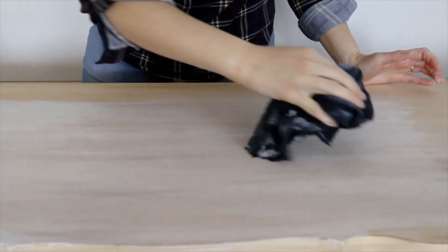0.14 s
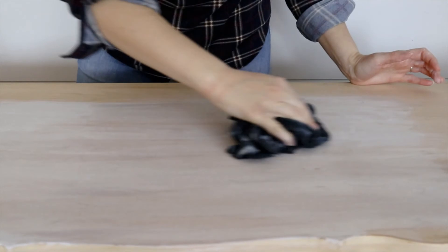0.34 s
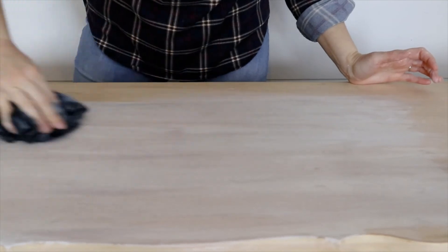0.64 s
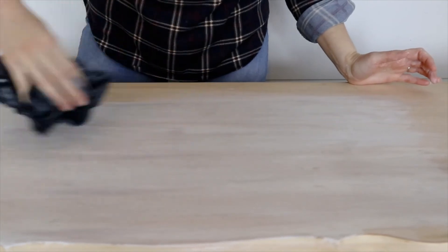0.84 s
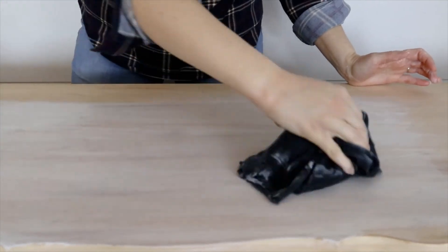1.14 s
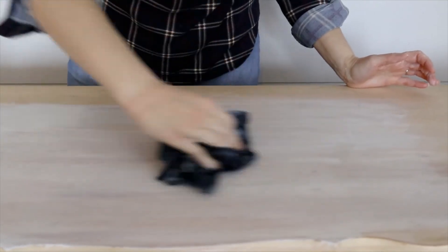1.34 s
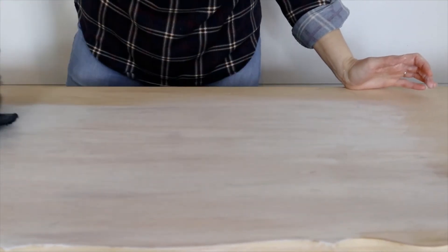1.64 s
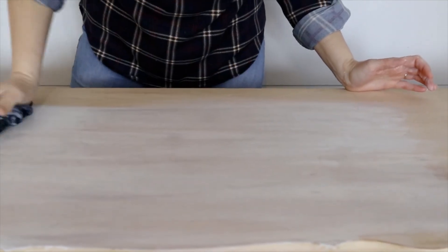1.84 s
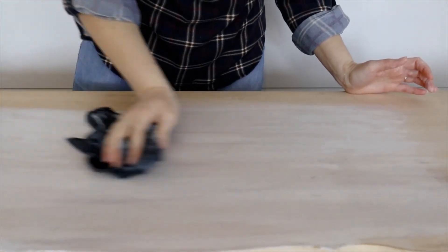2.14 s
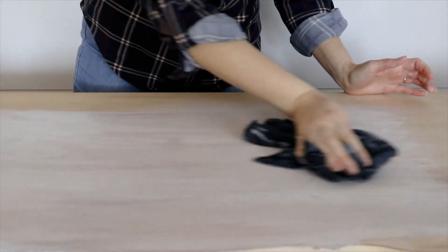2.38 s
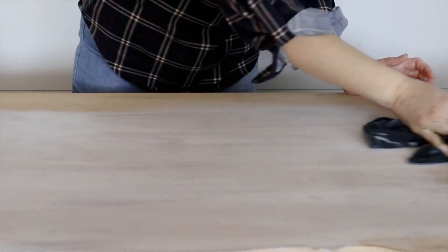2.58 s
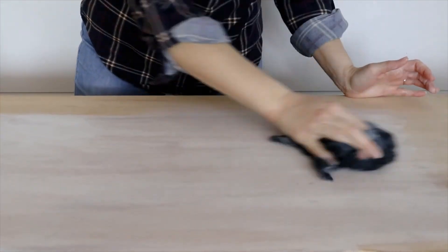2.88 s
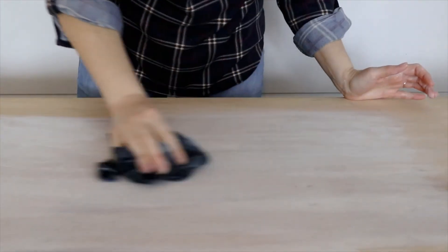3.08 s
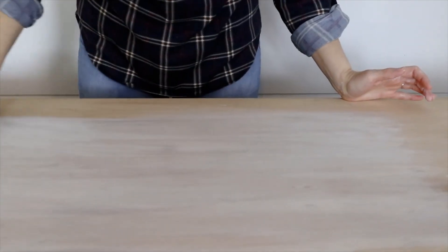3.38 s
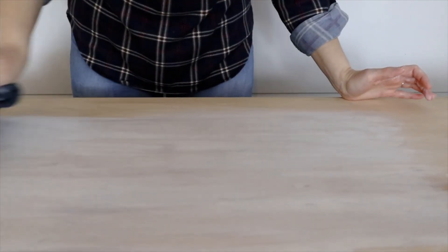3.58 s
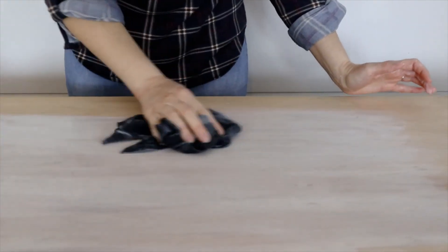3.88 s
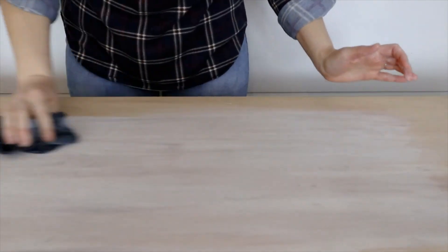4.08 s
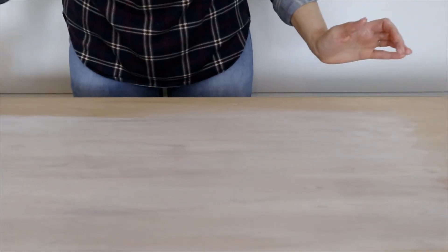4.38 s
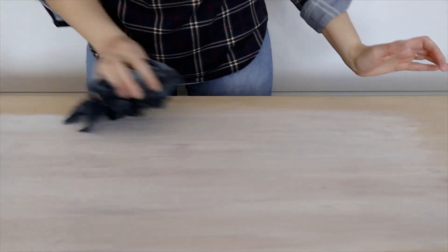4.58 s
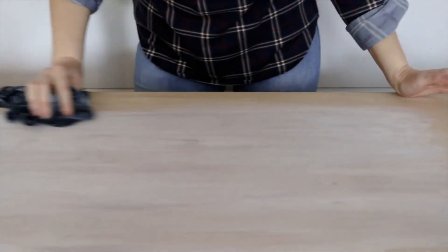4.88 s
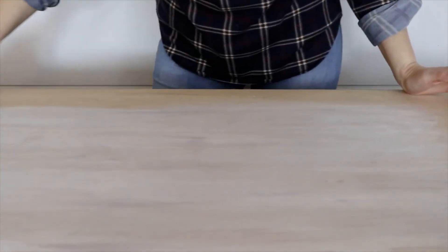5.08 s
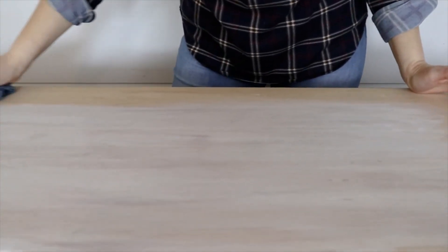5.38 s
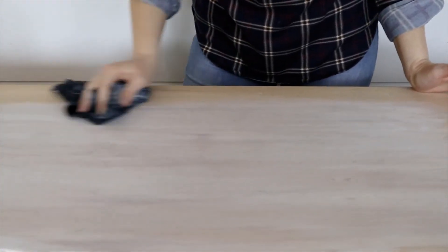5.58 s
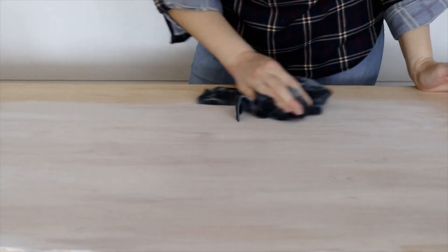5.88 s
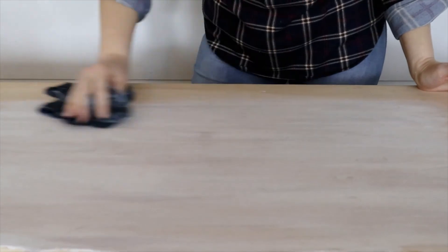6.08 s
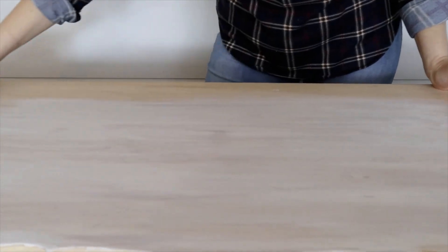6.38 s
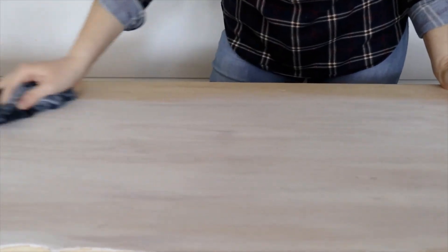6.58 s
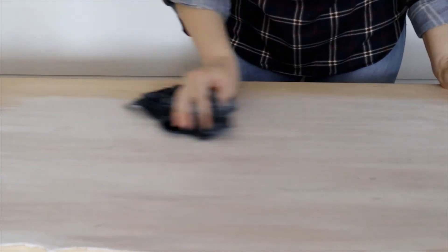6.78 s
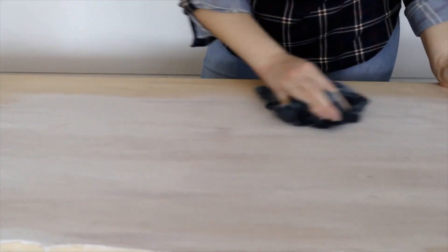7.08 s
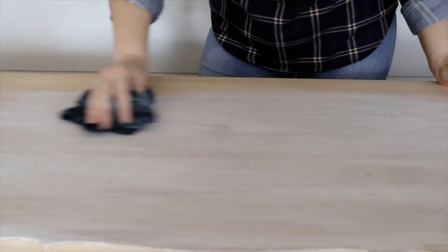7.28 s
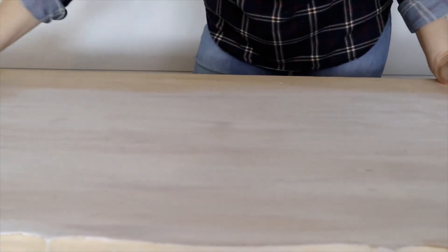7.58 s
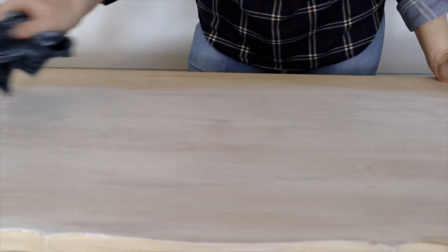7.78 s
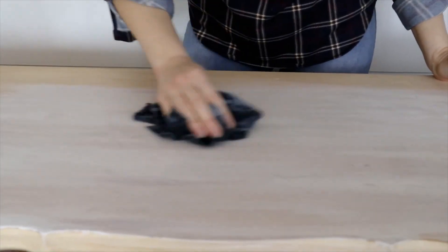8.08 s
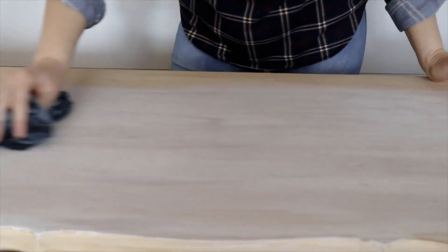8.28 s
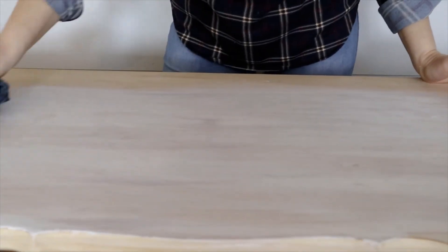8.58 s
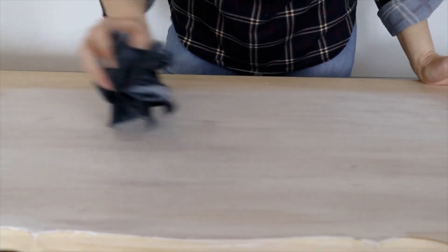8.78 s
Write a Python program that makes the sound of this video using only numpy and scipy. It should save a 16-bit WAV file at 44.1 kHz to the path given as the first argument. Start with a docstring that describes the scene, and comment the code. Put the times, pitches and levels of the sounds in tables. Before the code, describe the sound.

In a small room, heard closely in stereo, a cloth rag is wiped over a bare wooden tabletop. Dry, grainy hisses move at 0.3 s leftward, 1.25 s leftward and shorter, then 1.95 s rightward and 2.7 s back left, longer and with woody colour. Soft bumps fall at about 3.3 s, and at 3.53 s a hard little tick comes with a tiny falling squeak. A dull, cushioned thud leads into a stroke at 3.87 s. A cluster of muffled knocks at 4.56 to 4.68 s precedes the wipe at 4.7 s. Strokes then alternate steadily at 5.35, 5.9, 6.5 and 7.0 s, followed by a pause. At 8.0 s the hand lands with low thuds and scuffs, and a last wipe goes left until 8.5 s. Low mains hum, faint fan tones, deep rumble and soft room noise run throughout.

```python
"""Wiping a wooden tabletop

A cloth rag is wiped back and forth over a bare tabletop in a small room. Countless fibres slip on the
grain: shaped noise that follows the hand's speed and fizzes more the faster it goes. The board's
resonances colour the hiss, thud when the hand lands and sing under pressing fingers. Hard ticks and a
squeak are heard too; a deep rumble, a mains hum with faint fan tones and a soft room noise lie under it all."""
import sys
import numpy as np
from scipy import signal
from scipy.fft import rfft, irfft
from scipy.io import wavfile
from scipy.ndimage import uniform_filter1d

SR = 44100
rng = np.random.default_rng(int(sys.argv[2]) if len(sys.argv) > 2 else 0)


def generate_wav(sig):
    """Save sig (samples, or channels by samples) to the path in sys.argv[1] as 16-bit PCM at SR."""
    pcm = np.round(np.clip(np.atleast_2d(sig).T, -1, 1) * 32767).astype(np.int16)
    wavfile.write(sys.argv[1], SR, pcm)


N = 394254

# The strokes of the rag: start_s, length_s, level_db (relative), press_gain_db (start to end),
# from_place, to_place (-1 left, 1 right), rasp_hz (centre), woody_body_db, fold_rasp_db, fibre_fizz_db
# (the last three are strengths, weighted by pitch)
STROKES = [(0.3, 0.45, -35, 4.5, 0.97, -0.61, 3070, -12, 3.3, 0.5),
           (1.248, 0.29, -37.5, 7, 0.47, -0.93, 3120, 8, 3.9, 1.5),
           (1.95, 0.75, -33, -6, -0.33, 0.85, 1800, 1, 0.89, -6),
           (2.712, 0.77, -34.5, 2, 0.68, -0.98, 2240, -3.5, 1.2, -2),
           (3.870, 0.44, -35, 7, 0.21, -0.53, 2900, 1.5, 1.5, 0.5),
           (4.720, 0.38, -35, 6, -0.012, -0.57, 2700, -4.5, 1.4, 2),
           (5.352, 0.47, -34.5, 3.5, -0.78, 0.37, 3050, 2.5, 1.3, 0.5),
           (5.881, 0.47, -33, 4.5, 0.45, -0.76, 3020, -4, 2.1, -2),
           (6.474, 0.5, -34, 1.5, -0.9, 0.63, 1800, 2.5, 0.57, -3),
           (7.032, 0.58, -33.5, 2.5, 1, -1.04, 2870, 0, 1.8, -3.5),
           (8.033, 0.43, -33.5, 4, 0.66, -0.87, 2500, -3.5, 0.9, -4)]
# Light brushes as the rag is lifted, turned or set down: start_s, length_s, level_db (relative)
BRUSHES = [(0.2, .1, -70), (1.754, .07, -55.5), (1.838, 0.25, -44.5), (2.566, 0.16, -55),
           (3.527, 0.076, -44.5), (4.295, 0.15, -49), (4.566, 0.098, -50.5), (5.192, 0.26, -56),
           (6.383, 0.12, -58), (7.62, 0.11, -59), (8.51, .06, -46.5)]
# Fingers dig in: top_s, half_width_s, dig_db
DIGS = [(2.15, .04, 1), (3.38, 0.092, 3), (5.951, 0.06, 2.5), (7.12, .05, 1.5)]
# Colour of cloth on wood: pitch_hz, level_db (per Hz, relative)
RUB_COLOUR = [(220, -40), (380, -40), (455, -6.5), (522, -8), (571, -1), (685, -1.5), (871, -2.5),
              (998, -0.5), (1230, -1.5), (1590, -0.5), (2540, -3), (7540, -16), (11200, -19),
              (12000, -20.5), (14000, -42.5)]
# Low part of the rub: pitch_hz, level_db (relative)
RUB_LOWS = [(30, -33), (130, 4.0), (350, -0.5), (700, -43), (2000, -80)]
# Stereo width of the rub: pitch_hz, side_minus_mid_db
RUB_WIDTH = [(200, -68), (370, -8), (680, -22), (1260, -13), (2310, -9), (4240, -3.3), (6500, 0),
             (10000, 1.5), (14000, 9)]
# How much of the woody body and of the fizz acts at each pitch: pitch_hz, share (0 to 1)
BODY_SHARE = [(250, 0.024), (600, 0.28), (1000, 0.31), (1400, 0.07)]
FIZZ_SHARE = [(3900, 0.011), (5200, 0.32)]
# How much the spots of the board vary at each pitch: pitch_hz, share (0 to 1)
SPOT_SHARE = [(200, 0.2), (500, 0.98), (1300, 0.76), (4000, 0.36)]
# Colour change within a stroke: start_to_end_db, rest_to_full_speed_db (strengths, as in STROKES)
BODY_CHANGE = (-11, -14)
RASP_CHANGE = (0.45, 1.8)
FIZZ_CHANGE = (4.9, 1.5)
# Resonances (modes) of the tabletop: pitch_hz, level_db (relative), t60_s (time to fade by 60 dB)
BOARD_MODES = [(36, -20, 0.22), (118.2, 4.5, 0.18), (166.5, 15.5, 0.065), (236, 0, 0.17),
               (298.6, 1.5, 0.13), (333.5, 3.5, 0.084), (376, -8, 0.071), (450, -5.5, 0.062),
               (588, -12.5, 0.059), (685, -22, .08), (824, -33, .1), (1055, -29, .09)]
# The hand lands or bumps: start_s, thud_db (relative), favoured_pitch_hz, swell_s, scuff_db (relative),
# scuff_decay_s
BUMPS = [(.245, -41.5, 400, .005, -39, .02), (3.323, -28, 247, 0.0024, -44.5, .02),
         (3.365, -32, 150.4, 0.0041, -48, .02), (3.81, -21.5, 110, 0.061, -37.5, 0.026),
         (3.932, -32, 240, 0.005, -52, .03), (4.564, -25.5, 360, 0.004, -46, 0.037),
         (4.567, -29, 640, .004, -36, .016), (4.579, -16.5, 255, 0.01, -42, 0.046),
         (4.612, -30, 600, .003, -46, .02), (4.641, -25, 290, 0.005, -50, .02),
         (4.675, -34, 660, .009, -44, 0.028), (8.009, -28, 570, .004, -30.5, 0.018),
         (8.02, -23, 150, .005, -50, .03), (8.026, -17.5, 115, 0.022, -41, .06),
         (8.04, -28, 50, .0097, -38, 0.065), (8.068, -25, 190, .003, -34, .02),
         (8.12, -32, 400, 0.009, -33, 0.032), (8.152, -28, 150, .004, -38, .02),
         (8.19, -30, 172, .005, -50, .02), (8.247, -24, 150, 0.0025, -48, .02),
         (8.343, -30, 190, .003, -50, .02)]
# Soft scuff of cloth: pitch_hz, level_db (per Hz, relative)
SCUFF_COLOUR = [(25, -8), (60, 10), (200, 5), (400, 1.5), (680, 1), (1200, -7.5), (2300, -7.5), (4000, -24),
                (9000, -35), (14000, -44)]
# Pressing fingers make the board sing: start_s, length_s, pitch_hz, width_hz (before squaring),
# level_db (relative)
DRAGS = [(1.311, 0.12, 168, 110, -40.5), (1.968, 0.23, 805, 170, -38.5), (1.978, 0.14, 235, 180, -43),
         (3.31, 0.14, 200, 260, -41), (3.83, 0.22, 140, 90, -37.5), (4.03, .16, 860, 160, -46),
         (4.763, 0.077, 680, 110, -47.5), (5.911, 0.13, 740, 200, -40), (8.06, 0.13, 660, 280, -37.5),
         (8.04, .17, 150, 130, -37), (8.388, 0.03, 450, 70, -37)]
# Something hard scrapes and ticks on the wood: start_s, level_db (relative), swell_s, decay_s
TICKS = [(3.526, -29, .004, 0.015), (3.5335, -28.5, .0007, 0.0044), (3.545, -41, .002, 0.0079)]
# Resonances of the ticks: pitch_hz, width_hz, level_db (relative)
TICK_RING = [(810.4, 188, -3), (1150, 400, -6), (2060, 500, -2.5), (3530, 300, -4), (3960, 300, -4),
             (4400, 160, -4), (6430, 1500, -4)]
# The squeak of a slip: top_s, half_width_s, pitch_hz (at the top), glide_hz_per_s, level_db (relative)
SQUEAK = (3.5355, .0013, 3900, -70000, -25.5)
# Swells of the deep rumble: top_s, half_width_s, level_db (relative)
SWELLS = [(.27, .06, -35), (.48, .08, -42), (1.28, .14, -39), (3.88, .1, -39), (4.65, .14, -48),
          (6.42, .05, -35), (6.62, .06, -42), (8.11, .09, -38), (8.56, .08, -44)]
# Colour of the deep rumble: pitch_hz, level_db (per Hz, relative)
RUMBLE_COLOUR = [(10, -16), (28, -2), (38, 0), (43, 1), (53, -14), (120, -32), (400, -74)]
# Mains hum: pitch_hz, level_db (rms)
HUM = [(119.985, -34.2), (239.97, -48.2)]
# Faint fan tones: pitch_hz, level_db (rms)
FAN = [(270, -58.5), (354, -60), (435, -68.5), (460, -66.5), (999, -72)]
# Colour of the room noise: pitch_hz, level_db (per Hz, relative)
AIR_COLOUR = [(15, -12), (38, 0), (55, -9), (100, -2.5), (160, -3.5), (240, -3.5), (330, -6.5), (550, -14),
              (1000, -17.5), (2500, -23.5), (6000, -31), (11500, -41), (13500, -49.5)]
# Stereo width of the room noise: pitch_hz, side_minus_mid_db
AIR_WIDTH = [(40, -25), (120, -15.5), (220, -8), (380, -2.5), (650, 3.5), (1300, 4), (12000, 5.5)]

SPEED_POWER = 0.46  # the hiss grows as speed to this power
LINGER_T60_S, LINGER_SHARE = 0.29, 0.74  # part of the hiss hangs in the room
RUSTLE_DB = -66.5  # the rag in the moving hand, a relative floor
DIG_BODY, DIG_FLUTTER = 1.8, 0.35  # dB of body strength and of flutter added per dB of digging
RASP_WIDTH_HZ, RASP_GLIDE = 1140, 0.1  # the rasp band, and the share by which it rises with speed
MEAN_SPEED = 2 / 3  # average of a stroke's speed arch
MIC_PLACE = -0.25  # where the microphones stand along the table
MIC_SHADE_HZ = 4500  # around and above this pitch they tell left from right
RUMBLE_WAVER_DB = 2.0
AIR_DB = -44  # rms in the middle
EDGE_HZ = 14600


def rag(level_db=2.5, patchy_db=0.6, speckle_db=1.88, flutter_db=-0.26, brighten=0.069,
        ring_db=3, low_db=-8.5, echo=0.13, lean=0.5, pan=0.09, rightward=0.038):
    """Dense fibre slips: noise that follows the speed, coloured by the grip and by the board."""
    hz = np.fft.rfftfreq(1024, 1 / SR)
    t = np.arange(N // 256 + 5) * 256 / SR
    shape = (len(t), len(hz))
    rub_db = rubbing_level(t)[:, None]
    place, rasp_hz, body, rasp, fizz = grip(t)
    dig_db = sum(db * np.exp(-((t - s) / width) ** 2) for s, width, db in DIGS)[:, None]

    lows = gain_of(low_db + read(RUB_LOWS, hz))
    colour = np.maximum(gain_of(read(RUB_COLOUR, hz)), lows)
    # the upper modes of the board stand out of the hiss
    modes = sum(abs(peak(hz, f, 50)) ** 2 for f, _, _ in BOARD_MODES[3:])
    colour = colour * gain_of(ring_db * (modes - 0.29 * (hz < 1100)))
    colour /= np.sqrt(np.sum(colour[(hz > 1200) & (hz < 4000)] ** 2))

    field_db = rub_db + dig_db + level_db
    field_db = field_db + (body + DIG_BODY * dig_db) * read(BODY_SHARE, hz)
    field_db += rasp * abs(peak(hz, rasp_hz, RASP_WIDTH_HZ)) ** 2
    # faster fibres fizz more
    field_db += (fizz + brighten * (rub_db - rub_db.max())) * read(FIZZ_SHARE, hz)
    # folds of the cloth catch and let go, each in its own band
    field_db += patchy_db * patches(shape, frames_count=7, bins_count=12)
    # each spot of the board favours other narrow resonances
    field_db += speckle_db * patches(shape, frames_count=24, bins_count=2)
    # the whole level flutters, at a depth that digging changes
    flutter = patches((len(t), 1), frames_count=2, bins_count=1)
    field_db += (flutter_db + DIG_FLUTTER * dig_db) * flutter

    # the wall's echo combs the hiss, and the comb slides as the rag travels
    delay_s = 0.0042 + 0.00044 * place
    comb = (1 + echo * np.exp(-2j * np.pi * hz * delay_s)) / np.sqrt(1 + echo ** 2)
    mid = spectra(shape) * comb
    # in the treble the nearer microphone is louder and leads in phase; lower down the sound leans right
    shade = hz ** 2 / (hz ** 2 + MIC_SHADE_HZ ** 2)
    bearing = shade * (pan * place + 1j * lean * (place - MIC_PLACE)) + (1 - shade) * rightward
    # the room adds an unrelated side part
    side = spectra(shape) * gain_of(read(RUB_WIDTH, hz)) - bearing * mid
    z = np.array([mid, side]) * colour * gain_of(field_db)
    sound = signal.istft(z.transpose(0, 2, 1), nperseg=1024, noverlap=768)[1]
    return sound[:, :N] * np.sqrt(3 / 4)


def travel(t, start, length):
    """Progress through a stroke (-.5 to .5) and the hand's speed, an arch from rest to rest."""
    u = np.clip((t - start) / length, 0, 1)
    return u - 0.5, 1 - (2 * u - 1) ** 2


def rubbing_level(t):
    """Level of the hiss in dB: it follows speed and pressure, and lingers briefly."""
    power = np.zeros(len(t))
    for start, length, db, press_db, *_ in STROKES:
        progress, speed = travel(t, start, length)
        power += (gain_of(db + press_db * progress) * speed ** SPEED_POWER) ** 2
    for start, length, db in BRUSHES:
        _, speed = travel(t, start, length)
        power += (gain_of(db) * speed ** SPEED_POWER) ** 2
    keep = np.exp(-2 * np.log(1000) * (t[1] - t[0]) / LINGER_T60_S)
    lingering = signal.lfilter([1 - keep], [1, -keep], power)
    power = (1 - LINGER_SHARE) * power + LINGER_SHARE * lingering
    return 10 * np.log10(power + gain_of(RUSTLE_DB) ** 2)


def grip(t):
    """Place, rasp pitch, body, rasp and fizz: less woody and raspier with speed and along the stroke."""
    start, length, _, _, origin, goal, rasp_hz, *colours = np.transpose(STROKES)
    ends = np.column_stack([start, start + length]).ravel()
    place = np.interp(t, ends, np.column_stack([origin, goal]).ravel())
    speed = sum(travel(t, s, span)[1] for s, span in zip(start, length))
    extra_speed = speed - MEAN_SPEED
    centre_hz = np.interp(t, ends, np.repeat(rasp_hz, 2)) * (1 + RASP_GLIDE * extra_speed)
    tints = []
    for db, (drift_db, fast_db) in zip(colours, [BODY_CHANGE, RASP_CHANGE, FIZZ_CHANGE]):
        at_ends = np.column_stack([db - drift_db / 2, db + drift_db / 2]).ravel()
        tints.append(np.interp(t, ends, at_ends) + fast_db * extra_speed)
    return np.array([place, centre_hz, *tints])[:, :, None]


def tabletop(x, depth_db=2.5):
    """The board's many narrow resonances come and go at random under the moving rag."""
    hz, _, z = signal.stft(x, SR, nperseg=4096, noverlap=3072)
    spread_db = depth_db * read(SPOT_SHARE, hz)
    gain = gain_of(spread_db * patches(z.shape[:0:-1], frames_count=11, bins_count=2))
    gain /= np.exp((spread_db * np.log(10) / 20) ** 2)  # the mean power stays the same
    return signal.istft(z * gain.T, nperseg=4096, noverlap=3072)[1][:, :N]


def bumps(spread_octaves=0.32):
    """A soft hand pushes the board into its modes; where it lands decides which ones speak."""
    out, t = np.zeros(N), np.arange(SR // 2) / SR
    for s, db, hz, swell, scuff_db, scuff_decay in BUMPS:
        ring = np.zeros(len(t))
        for f, mode_db, t60 in BOARD_MODES:
            favour = 1 / (1 + (np.log2(f / hz) / spread_octaves) ** 2)
            ring += favour * gain_of(mode_db - 60 * t / t60) * np.sin(2 * np.pi * f * t)
        thud = ring * (1 - np.exp(-(t / swell) ** 2))  # the cloth cushions the blow
        scuff_shape = (1 - np.exp(-t / 0.00081)) * np.exp(-t / scuff_decay)
        scuff = coloured(SCUFF_COLOUR, len(t)) * scuff_shape
        add(out, s, gain_of(db) * thud / abs(thud).max() + gain_of(scuff_db) * scuff)
    return out


def drags():
    """Friction feeds one resonance of the board for a moment: narrow noise that fades in and out."""
    out, hz = np.zeros(N), np.fft.rfftfreq(SR, 1 / SR)
    for s, length, centre_hz, width_hz, db in DRAGS:
        sung = irfft(spectra(len(hz)) * peak(hz, centre_hz, width_hz) ** 2)[:round(length * SR)]
        add(out, s, gain_of(db) * evened(sung) * signal.windows.tukey(len(sung), 0.6))
    return out


def ticks(soft_hz=5200):
    """Short scrapes of something hard, ringing in a few resonances; the wood dulls their top."""
    out, t, hz = np.zeros(N), np.arange(4096) / SR, np.fft.rfftfreq(4096, 1 / SR)
    body = sum(gain_of(db) * peak(hz, f, width) for f, width, db in TICK_RING)
    body = body / (1 + (hz / soft_hz) ** 6)
    for s, db, swell, decay in TICKS:
        scrape = evened(irfft(spectra(len(body)) * body))
        add(out, s, gain_of(db) * scrape * (1 - np.exp(-t / swell)) * np.exp(-t / decay))
    return out


def squeak():
    """A few quick cycles of stick and slip: a sine falling in pitch."""
    s, width, hz, glide, db = SQUEAK
    t = np.arange(N) / SR - s
    return gain_of(db) * np.exp(-(t / width) ** 2) * np.sin(2 * np.pi * (hz * t + glide * t ** 2 / 2))


def room(x, t60, wet_db, side_db):
    """The direct sound in the middle, and a short diffuse tail of fading noise in mid and side."""
    t = np.arange(SR // 2) / SR
    tail = rng.standard_normal((2, len(t))) * gain_of(-60 * t / t60) * (t > 0.004)
    wet = signal.fftconvolve(x[None], tail / np.linalg.norm(tail[0]), axes=1)[:, :N]
    return np.array([x, np.zeros(N)]) + gain_of([[wet_db], [wet_db + side_db]]) * wet


def rumble(trim_db=-2, rest_db=-51.0):
    """Deep, centred noise that wavers and now and then swells."""
    t = np.arange(N) / SR
    waver = evened(sum(np.sin(2 * np.pi * (f * t + rng.random())) for f in np.geomspace(1, 5, 12)))
    power = gain_of(rest_db + RUMBLE_WAVER_DB * waver) ** 2
    power += sum(gain_of(db) ** 2 * np.exp(-((t - s) / width) ** 2) for s, width, db in SWELLS)
    level = gain_of(trim_db) * np.sqrt(power)
    return np.array([level * coloured(RUMBLE_COLOUR, N), np.zeros(N)])


def hum(waver_cycles=0.24):
    """A steady mains hum with its octave, and faint fan tones whose phase wavers."""
    t = np.arange(N) / SR
    mains = sum(gain_of(db) * np.sin(2 * np.pi * hz * t) for hz, db in HUM)
    drift = sum(np.sin(2 * np.pi * (f * t + rng.random())) / f for f in np.geomspace(0.3, 5, 12))
    phase = waver_cycles * evened(drift)
    fan = sum(gain_of(db) * np.sin(2 * np.pi * (hz * t + phase)) for hz, db in FAN)
    return np.sqrt(2) * np.array([mains + fan, np.zeros(N)])  # root 2 turns rms into sine height


def air():
    """Room noise: a centred rumble and a wide, faint hiss."""
    hz = np.fft.rfftfreq(N, 1 / SR)
    side = irfft(rfft(coloured(AIR_COLOUR, N)) * gain_of(read(AIR_WIDTH, hz)), N)
    return gain_of(AIR_DB) * np.array([coloured(AIR_COLOUR, N), side])


def gain_of(db):
    """Decibels to a factor."""
    return 10 ** (np.asarray(db) / 20)


def evened(x):
    """Scaled to rms 1."""
    return x / np.sqrt(np.mean(x ** 2) + 1e-20)


def read(points, hz):
    """A table read on a log-frequency axis."""
    f, value = np.transpose(points)
    return np.interp(np.log(hz + 1), np.log(f + 1), value)


def add(mix, s, sound):
    """Adds a sound to the mix at time s."""
    part = mix[max(round(s * SR), 0):][:len(sound)]
    part += sound[:len(part)]


def coloured(points, size):
    """Noise of rms 1 with the given spectrum."""
    gain = gain_of(read(points, np.fft.rfftfreq(size, 1 / SR)))
    return evened(irfft(rfft(rng.standard_normal(size)) * gain, size))


def peak(hz, centre_hz, width_hz):
    """Response of one resonance, 1 at its centre."""
    return 1 / (1 + 2j * (hz - centre_hz) / width_hz)


def spectra(shape):
    """Random complex spectra: noise with random size and phase at every pitch."""
    return rng.standard_normal(shape) + 1j * rng.standard_normal(shape)


def patches(shape, frames_count, bins_count):
    """Smooth chance over time and frequency, rms 1."""
    over_time = uniform_filter1d(rng.standard_normal(shape), size=frames_count, axis=0)
    return evened(uniform_filter1d(over_time, size=bins_count, axis=1))


def scene():
    """All sources as mid and side, turned into left and right; the board's thuds stay near the centre."""
    board = room(bumps() + drags(), t60=0.22, wet_db=-17, side_db=-18)
    clicks = room(ticks() + squeak(), t60=0.22, wet_db=-15, side_db=5)
    mid, side = tabletop(rag()) + board + clicks + rumble() + hum() + air()
    return np.array([mid + side, mid - side])


def record(dry):
    """The recorder's band limit: a low-pass at EDGE_HZ."""
    low_pass = signal.firwin(511, EDGE_HZ, window=("kaiser", 9), fs=SR)
    return signal.oaconvolve(dry, low_pass[None], "same")


dry = scene()
out = record(dry)
generate_wav(out)
```